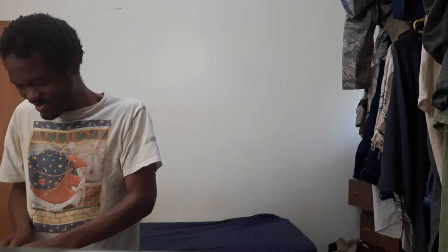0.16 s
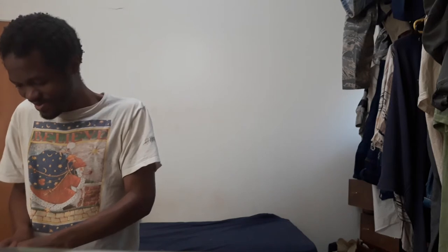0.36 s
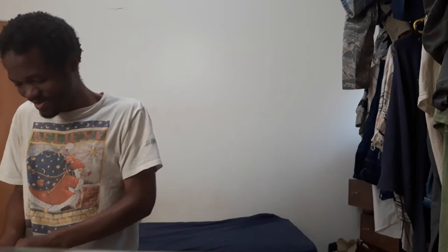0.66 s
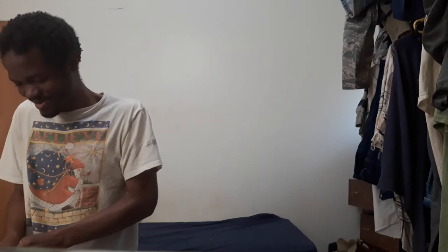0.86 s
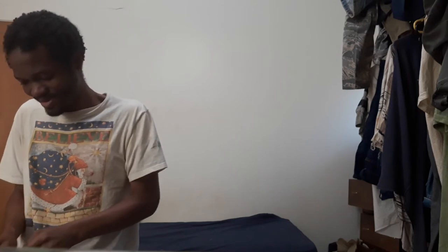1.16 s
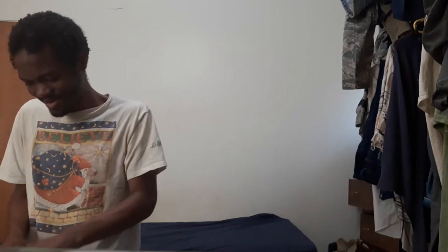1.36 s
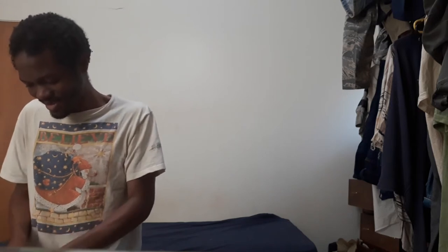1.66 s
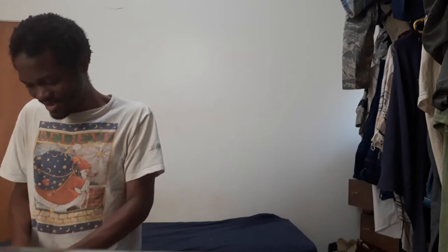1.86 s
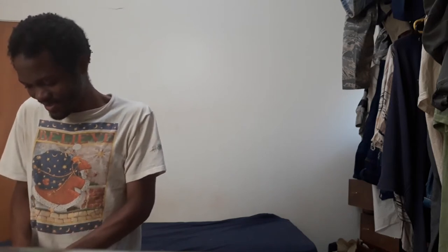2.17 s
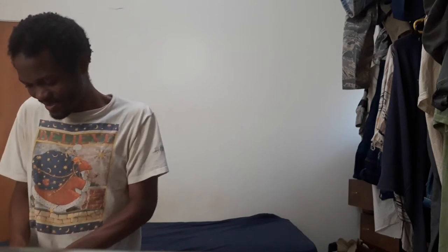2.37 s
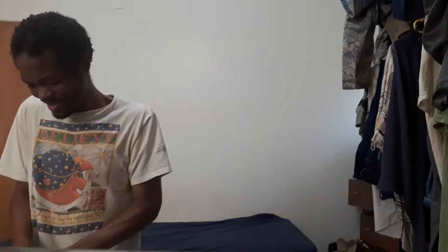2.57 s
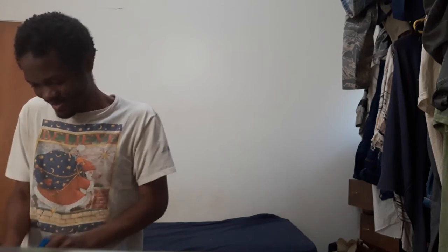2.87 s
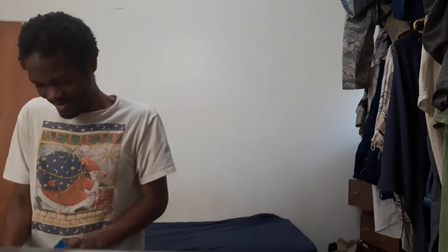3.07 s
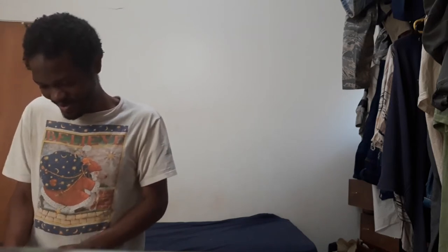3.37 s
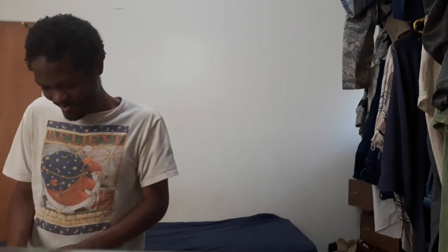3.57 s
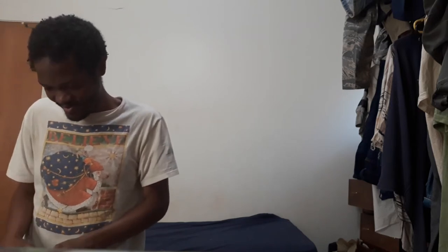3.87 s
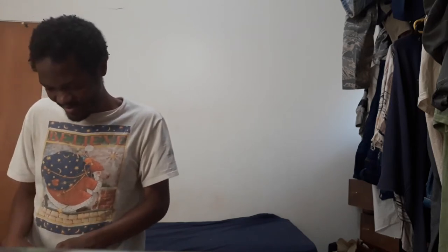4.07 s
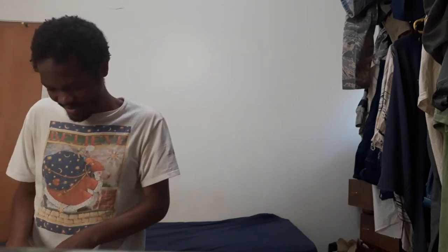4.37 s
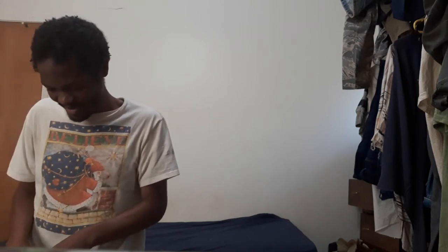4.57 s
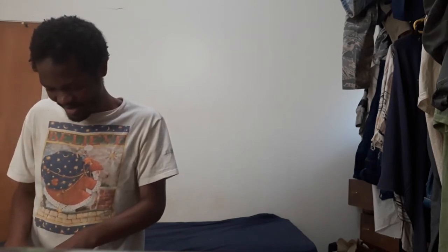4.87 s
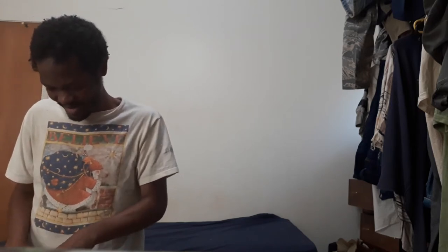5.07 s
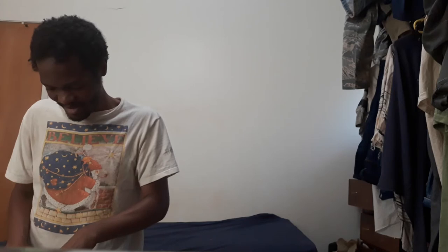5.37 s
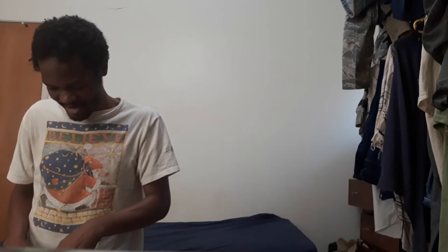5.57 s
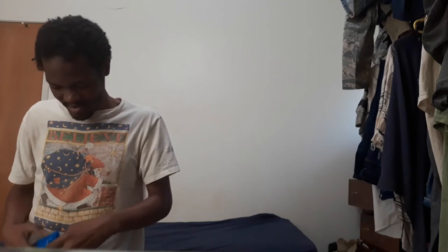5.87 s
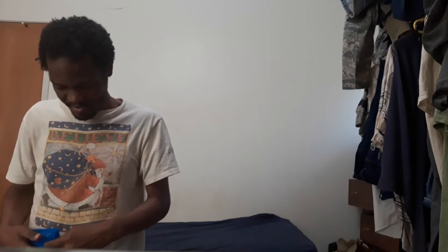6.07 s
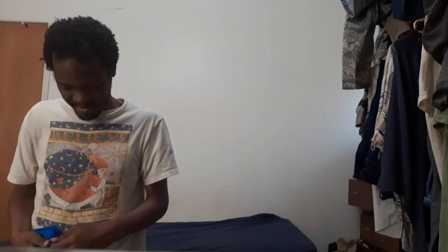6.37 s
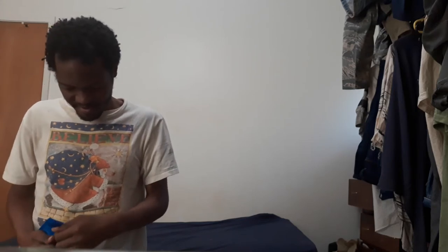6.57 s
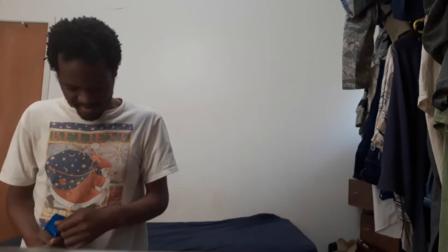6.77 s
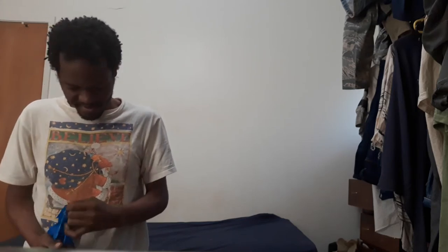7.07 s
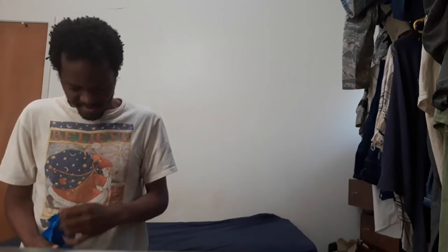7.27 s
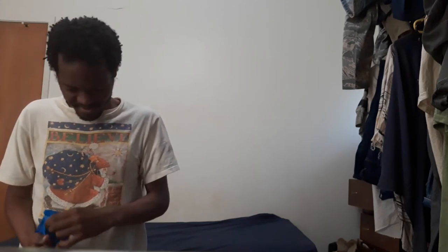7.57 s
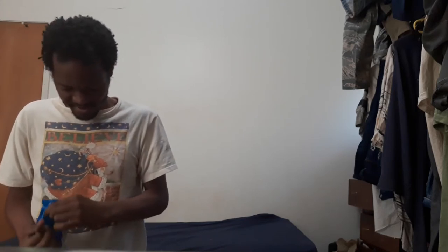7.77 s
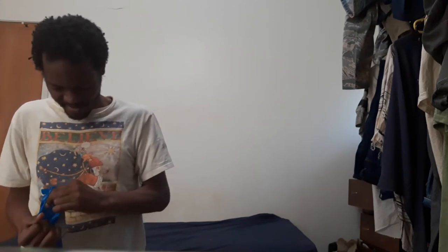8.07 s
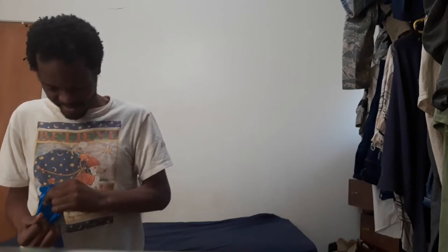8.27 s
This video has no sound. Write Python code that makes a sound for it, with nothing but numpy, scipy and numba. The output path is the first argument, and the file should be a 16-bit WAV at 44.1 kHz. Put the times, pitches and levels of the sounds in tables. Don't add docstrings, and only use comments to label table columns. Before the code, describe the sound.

Close to the microphone in a quiet, damped bedroom, hands tear a small plastic packet. Small crackles lead to a sharp rip within the first half second, then looser rustling. A denser flurry of snaps and rips follows, with soft low knocks on a wooden desk as the contents land. Afterwards come scattered light crinkles and thin folding sounds, over faint hiss and a distant low hum.

```python
import sys
import numpy as np
from scipy import signal
from scipy.fft import rfft, irfft, next_fast_len
from scipy.io import wavfile
from numba import njit

SR = 44100
rng = np.random.default_rng(int(sys.argv[2]) if len(sys.argv) > 2 else 0)


def ratio_of_db(decibels):
    return 10 ** (np.asarray(decibels, float) / 20)


def put_to_file(sound):
    columns = np.atleast_2d(sound).T
    safe = np.clip(columns, -1, 1)
    whole_steps = np.round(safe * 32767)
    wavfile.write(sys.argv[1], SR, whole_steps.astype(np.int16))


N = 370881

# f/Hz, density level/dB
AIR_SPECTRUM = [(28, -17), (48, -1.5), (130, -0.5), (200, -14), (1200, -27.5), (3200, -16), (6300, -24.5),
                (16000, -48)]
# t/s, level/dB
HUM_FADE = [(4.5, 1), (7.5, -2)]
# f/Hz, t60/s
ROOM_DECAY = [(150, 0.27), (1000, 0.27), (4000, 0.25), (12000, 0.21)]
# f/Hz, level/dB
MIC_RESPONSE = [(40, -31), (90, -16), (170, -3.5), (300, -2.5), (600, 1), (1000, -8), (1400, -1), (2300, 2),
                (3200, 3.5), (4500, 0), (6500, -3.5), (9000, 3.5), (12000, -0.5), (16000, -1.5)]
# f/Hz, level/dB
RECORDER_TOP = [(16330, 0), (16530, -70)]
# f/Hz, level/dB
LOW_DIPS = [(450, 1), (570, -0.5), (690, -7), (850, 0.5), (1050, 0), (1250, 1.5), (1700, -3), (2200, -1)]
# f/Hz, level/dB
LIFTED_DIPS = [(450, 2), (800, 3), (1050, 3.5), (1500, 3), (2700, -2), (6000, 7), (8000, -4.5), (9500, 3)]
# t/s, peak level/dB
THUMPS = [
    (0.489, -49.5),
    (2.772, -36),
]
# t/s, peak level/dB, panel overtone level/dB
KNOCKS = [(1.952, -53, 2), (2.15, -43, -18), (2.693, -54.5, 19), (2.738, -34, -6), (2.845, -36.5, -7.5),
          (3.095, -40.5, -12), (3.13, -36, -11), (3.342, -43, -23), (3.388, -29.5, -16), (3.442, -32, -7),
          (3.509, -34, -4), (3.686, -23, -24), (3.693, -40.5, -2), (3.744, -24, -12.5), (3.766, -39, 2.5),
          (5.542, -40.5, -0.5)]
# f/Hz, level/dB, t60/s
DESK_MODES = [(105, -4, 0.12), (189, 5.5, 0.098), (218, -4.5, 0.11)]
# f/Hz, level/dB, t60/s
PANEL_MODES = [(392.5, 1.5, 0.14), (462, 10, 0.033), (610, -8, 0.078), (828, -25, .05)]
# t/s, f/Hz
POCKET_PITCH = [(0, 1120), (.5, 918), (3.5, 958), (3.7, 708), (4.0, 1047), (5.9, 1283), (6.7, 1300),
                (7.0, 1000), (7.6, 1130), (8.2, 1214), (8.4, 700)]
# start t/s,
# length t/s, level/dB, f/Hz
CAVITIES = [(0.22, 0.049, -49.5, 2400), (.47, 0.062, -29.5, 2020), (0.48, 0.045, -39.5, 420),
            (2.737, 0.027, -31.5, 5460), (6.797, 0.065, -66, 450), (7.315, 0.044, -66, 530),
            (8.076, 0.036, -62, 490), (5.546, 0.049, -59, 700), (2.75, 0.019, -32, 1950),
            (2.858, .015, -52, 1800), (3.094, 0.04, -41, 1800), (3.096, 0.061, -46.5, 2900),
            (3.099, 0.061, -42, 640), (3.167, 0.09, -55.5, 2630), (3.16, 0.093, -52.5, 1700),
            (3.094, 0.054, -51, 5400), (3.164, 0.076, -55, 740), (3.437, .05, -55, 4100),
            (3.43, 0.037, -57, 3800), (3.86, .12, -63.5, 3540), (3.316, 0.033, -51, 1420),
            (3.442, 0.052, -47, 1500), (3.502, 0.037, -44.5, 1510), (6.806, 0.057, -54, 790),
            (6.905, 0.041, -59, 880), (7.195, 0.022, -54, 1400), (7.937, 0.06, -67, 1170),
            (7.906, 0.017, -42.5, 940), (8.16, 0.11, -71, 1210), (8.333, 0.052, -62, 1440),
            (4.299, 0.71, -91, 3330), (1.954, 0.048, -50, 940), (2.58, 0.13, -55.5, 450),
            (4.8, 0.12, -71, 1300), (5.7, .07, -63, 830), (6.276, 0.22, -65, 1310),
            (6.598, 0.062, -59, 1250), (7.12, 0.048, -60, 830), (7.006, 0.039, -41, 890),
            (7.185, 0.03, -56, 2100), (7.305, 0.045, -58, 820), (7.75, 0.26, -75.5, 440),
            (7.66, 0.21, -69.5, 1220), (7.6, 0.014, -54, 1290), (8.075, 0.074, -51, 1150),
            (8.32, 0.064, -64.5, 420),
            (8.08, 0.033, -52, 8300), (8.081, 0.03, -52, 12000), (2.735, .04, -39, 20000),
                  (2.736, .035, -35, 10000), (2.63, .13, -51.5, 21000), (2.689, .008, -41, 10000),
                  (7.2, 0.042, -56, 1720), (5.95, .06, -59, 1320), (7.62, 0.18, -71, 3600),
                  (7.8, 0.078, -68, 1840), (6.7, .06, -68, 2300), (1.4, 0.25, -66.5, 3220),
                  (7.2, 0.64, -79, 401), (.44, 0.04, -36, 2100), (2.2, 0.058, -48, 1540),
                  (6.8, .25, -65.5, 640), (1.944, 0.017, -45, 5240)]
# start t/s, length t/s, level/dB, hollow level/dB, bright level/dB
GRIPS = [
    (0, 1.4, -68.5, -8, -18),
    (1.43, 2.4, -70, -19, -11.5),
    (4.682, 4.6, -69.5, -6, -3.5),
    (8.203, 0.33, -100, -4, -13),
]
# start t/s, length t/s, level/dB, hollow level/dB, bright level/dB
SHIFTS = [(0.0, 0.036, -52.5, -8.5, -11.5), (.07, 0.23, -58.5, -2, -13.5), (.41, 0.22, -48.5, -12, -6),
          (.71, 0.18, -53, -14, -13), (.95, 0.054, -46.5, -19, -11), (1.1, 0.31, -54, -35, 0),
          (1.55, 0.24, -58.5, -7, -8.5), (1.86, 0.27, -54.5, -21, -2.5), (2.14, 0.39, -51.5, -11, -4),
          (2.56, 0.37, -46.5, -8.5, -0.5), (3.1, 0.4, -57, -5, -10), (3.69, 0.21, -56.5, -24, -16),
          (3.95, 0.12, -55, -15, -14), (4.19, 0.13, -60.5, -13, -4.5), (4.64, 0.23, -69, -7, -10),
          (4.95, 0.062, -65, -27, -13), (5.13, 0.23, -65, -16, -10), (5.35, 0.811, -55.5, -6.5, -3),
          (6.26, 0.21, -61.5, -7, -5), (6.44, 0.072, -55.5, -17, -4.5), (6.6, 0.27, -57, -2, 2),
          (7.13, 0.32, -62, -11, -6.5), (7.31, 0.08, -67.5, -6, 12), (7.5, 0.44, -69.5, -1, 5),
          (7.95, 0.19, -65, -5, 4), (2.95, 0.029, -56.5, -8, -4)]
# start t/s, length t/s, end level/dB, hollow level/dB, bright level/dB
PULLS = [(.125, 0.046, -50, -5, -6), (.18, 0.084, -45, -2.5, -4), (.428, 0.073, -25.5, 1, -2.5),
         (1.32, 0.05, -59, -11, 3), (1.925, 0.027, -41.5, -36, 1), (2.18, 0.051, -40, -2, 2.5),
         (2.676, 0.0094, -34.5, 2, -3), (5.36, 0.061, -67, -20, 12.5), (5.86, 0.063, -48, -6, -10),
         (6.87, 0.15, -47, -5.5, 2.5), (7.88, 0.049, -53, -1.5, -5)]
# start t/s, length t/s, start level/dB, hollow level/dB, bright level/dB
SLIPS = [(1.215, 0.093, -49.5, -9.5, 1.5), (1.96, 0.063, -56.5, 8, -14), (2.145, 0.033, -41.5, 1, -5),
         (2.25, 0.065, -44.5, 2, -3.5), (2.735, 0.046, -33.5, 2, -1), (2.85, 0.098, -48, 4.5, -3),
         (3.097, 0.064, -43.5, 0, -9.5), (3.18, 0.12, -56, 3.5, -8.5), (3.315, 0.16, -62, 4.5, -24),
         (3.441, 0.035, -43, 3.5, -17.5), (3.503, 0.024, -47.5, 1, -24), (3.687, 0.041, -42, 3, -26.5),
         (3.735, 0.054, -44, 5.5, -16), (8.08, 0.041, -54.5, 6, 6.5), (8.335, 0.11, -75, 8.5, -14)]
# t/s, peak level/dB, hollow level/dB,
# bright level/dB, film f/Hz
SNAPS = [(0.0706, -36.5, -19, -23, 3040), (0.1254, -37.5, -18, -26, 3050),
         (0.1308, -33, -34, -23, 3100), (0.152, -34, -15, -23, 3100),
         (0.3642, -52.5, -24, -23.5, 3470), (0.2312, -30.5, -9.5, -16, 3220),
         (0.409, -30.5, -23, -27.5, 3340), (0.4304, -32.5, -15.5, -14.5, 2530),
         (0.4453, -27, -16, -11.5, 3100), (0.4702, -13.5, -11, -16.5, 2080),
         (0.4779, -10, -19, -13, 2360), (0.4952, -13, -11.5, -19.5, 2840),
         (0.953, -57, -26, -36, 2300), (0.9701, -36.5, -24, -23, 3170),
         (1.1041, -34.5, -48, -10.5, 5150), (1.1928, -40, -28, -5, 2360),
         (1.2201, -37.5, -17, 2, 5200), (1.7234, -40.5, -33, -11, 3630), (1.8641, -38, -50, -29, 3540),
         (1.8987, -43, -34, 1, 5100), (1.9431, -24, -17, -6, 3100), (1.9953, -32.5, -17, -8.5, 4200),
         (2.0694, -30.5, -18.5, -15, 4660), (2.124, -48, -13, -1, 2830),
         (2.141, -19.5, -21, -15.5, 2750), (2.1903, -25, -11, -19, 4500),
              (2.204, -25, -14, -6.5, 3000), (2.2199, -29.5, -22, -2, 3000), (2.2694, -35, -7, 4.5, 2950),
              (2.4546, -28, -36, -21, 4460), (2.5655, -48, -30.5, -2, 3370), (2.5881, -50, -20, -11, 2610),
              (2.628, -25.5, -10, -2.5, 2870), (2.6898, -13, -15, -14, 2870),
              (2.6924, -16.5, -25, -14, 2050), (2.732, -12, -18, -15, 2050), (2.7363, -26, -13, -6, 2570),
              (2.743, -17.5, -13, -7.5, 2180), (2.75, -24.5, -12.5, -3, 2630), (2.76, -28.5, -12, -9, 4460),
              (2.8444, -38, 5.5, -15, 4060), (2.862, -19, -17, -16, 3080), (3.0953, -31, -3.5, -17, 3000),
              (3.3141, -39, -18, -32, 2370), (3.347, -35, -30, -39, 2930), (3.3875, -35.5, -1, -41, 3770),
              (3.4421, -33, -9, -33, 3930), (3.5029, -34, -1, -35, 3830), (3.684, -28.5, -9, -25, 2900),
              (3.7324, -36, -3, -10, 3380), (3.5718, -42, -20, -28, 3530), (3.663, -50, -26, -27, 3070),
              (2.685, -30, -9, -11, 2780), (2.7545, -24, -24, -6, 4460), (2.872, -33, -15, -9, 2500),
              (3.456, -46, -8, -19, 4300),
         (3.967, -44.5, -34, -34, 2700), (3.9972, -38.5, -27, -35.5, 4240),
              (4.1467, -45.5, -34, -33, 3410), (4.2446, -42, -31, -22, 4200),
              (4.2852, -38.5, -27.5, -16, 3350), (4.8422, -47, -16, -15, 3100),
              (5.015, -46.5, -23, -10, 3800), (5.0584, -45, -19, -13, 4300), (5.131, -52, -8, -24, 2620),
              (5.1671, -45, -13, -23, 2400), (5.3665, -34, -44, -29.5, 4550),
              (5.5413, -22, -26, -15.5, 3100), (5.5447, -27.5, -21, -8.5, 6250),
              (5.586, -40, -15, -6, 5500), (5.399, -45, -30, -4, 4700), (5.426, -42, -35, -14.5, 4000),
              (5.909, -48, -13, -15, 2500), (6.261, -46, -30, -10, 3600), (6.314, -40.5, -22, -13, 3300),
              (5.6461, -37, -12.5, -7, 3450), (5.7153, -30, -16, -13.5, 2930),
              (5.8523, -39.5, -14.5, -31, 4000), (5.946, -29, -26, -16, 2700),
              (6.0142, -37, -25, -8.5, 3780), (6.0656, -34.5, -41, -30, 2903), (6.151, -44, -36, -23, 3450),
              (6.268, -28, -41, -26, 4000), (6.3047, -35, -24, -10.5, 3370), (6.4487, -36, -21, -25, 3750),
         (6.605, -37, -38, -6, 2670), (6.7, -37.5, -33, -21, 3800), (6.7145, -33, -21, -15, 3300),
              (6.739, -32, -16, -7.5, 3450), (6.7992, -32, -13.5, 1.5, 4470), (6.662, -38, -24, -19, 3330),
              (6.8747, -38, -18, -11, 3370), (6.9005, -46, -6, -3, 4170), (6.9146, -37, -18, -5, 3350),
              (6.925, -42, -2, -5, 2420), (7.165, -61, -34, -17, 2950), (7.534, -51, -25, -11, 4910),
              (7.626, -51, -20, -15, 3280), (7.8855, -47, -25, -18, 3320), (8.0686, -42.5, -3, -12, 3460),
              (8.278, -49.5, -30, -28, 3270), (8.3927, -50, -18, -14, 4130), (6.9426, -44, -12, 5, 2600),
              (6.9652, -32.5, -26, 1.5, 3350), (6.9895, -33, -11, -2, 6620), (7.001, -45, -16, 4, 4600),
              (7.014, -42, -6.5, -7, 2600), (7.675, -55, -22, -18, 3600), (7.789, -51, -13, -4, 3600),
              (7.353, -43, -24, -14, 3260), (7.1464, -36.5, -17, -24, 3380),
              (7.1773, -29.5, -20, -8.5, 3100), (7.3198, -37, -13, -31, 3550),
              (7.4125, -38.5, -31, -5.5, 5000), (7.7106, -43, -21, -20, 3380),
              (7.7449, -45.5, -11, -6, 3300), (7.905, -33.5, -12, -14, 2170),
              (7.928, -36.5, 2.5, -15.5, 3150), (8.0296, -46, 0, -1, 4160), (8.0798, -30.5, -5.5, -4, 5100),
              (8.0795, -31.5, -29, 2.5, 2320), (8.334, -48, -10.5, -13, 4140)]

FILM_HZ, EDGE_HZ = 3110, 7000
ECHO_S, ECHO_DB = 0.0025, -2
CAVITY_WET, SNAP_WET, DESK_WET = 0.35, 0.65, 0.64
SILENT_DB = -30
PITCH, SIZE, SIGN, WHEN, BIG = slice(0, 3), slice(3, 6), 6, 7, 8


def colour(x, points):
    hz, db = np.transpose(points)
    size = next_fast_len(len(x))
    f = np.maximum(np.arange(size // 2 + 1) * SR / size, 1)
    gain = ratio_of_db(np.interp(np.log(f), np.log(hz), db))
    return irfft(rfft(x, size) * gain, size)[:len(x)]


def level(x, db):
    return x * ratio_of_db(db) / np.sqrt(np.mean(x ** 2))


@njit
def rings(count, start, step, fade, rise, size):
    out = np.zeros(count)
    for k in range(len(start)):
        c, s = fade[k] * np.cos(step[k]), fade[k] * np.sin(step[k])
        x, y, q = size[k], 0., 1.
        i = int(start[k])
        for n in range(i, min(i + int(5 / (1 - fade[k])), count)):
            out[n] += y * (1 - q)
            x, y, q = c * x - s * y, s * x + c * y, q * rise[k]
    return out


def strike(s, hz, tau, size, soft):
    s, hz, tau, size = (np.ravel(v + 0. * hz) for v in (s, hz, tau, size))
    fade = np.exp(-1 / (tau * SR))
    rise = np.exp(-1 / (soft * tau * SR))
    return rings(N, s * SR, 2 * np.pi * hz / SR, fade, rise, size)


def air():
    hum_hz, width_hz = 92, 27
    hum_band = [(hum_hz - 2 * width_hz, -40), (hum_hz, 0), (hum_hz + 2 * width_hz, -40)]
    hiss = level(colour(rng.standard_normal(N), AIR_SPECTRUM), -67)
    hum = level(colour(rng.standard_normal(N), hum_band), -66.5)
    return hiss + hum * ratio_of_db(np.interp(np.arange(N) / SR, *np.transpose(HUM_FADE)))


def room_tail(t):
    hz, t60 = np.transpose(ROOM_DECAY)
    tail = 0
    for f in 100 * 2. ** np.arange(8):
        octave = [(f / 2, -40), (f / 1.3, 0), (f * 1.3, 0), (f * 2, -40)]
        band = colour(rng.standard_normal(len(t)), octave)
        tail = tail + band * ratio_of_db(-60 * t / np.interp(np.log(f), np.log(hz), t60))
    tail *= 1 - np.exp(-(t / 0.0026) ** 2)
    tail *= ratio_of_db(-1.5) / np.sqrt(np.sum(tail ** 2))
    echo_s = ECHO_S * (1 + 0.25 * (rng.random() - 0.5))
    tail[int(echo_s * SR)] += ratio_of_db(ECHO_DB)
    return tail


def room(x):
    places, moves_per_s = 6, 5.5
    t = np.arange(SR // 3) / SR
    place = np.arange(N) / SR * moves_per_s
    out = x
    for k in range(places):
        away = np.abs((place - k + places / 2) % places - places / 2)
        share = np.cos(np.pi / 2 * np.minimum(away, 1))
        out = out + signal.oaconvolve(x * share, room_tail(t))[:N]
    return out


def thumps():
    s, db = np.transpose(THUMPS)
    t60_s = 0.2
    return strike(s, 78.4 + 0 * s, t60_s / np.log(1000), ratio_of_db(db + 19.0), soft=0.45)


def desk():
    s, db, over_db = np.transpose(KNOCKS)[:, :, None]
    hz, mode_db, t60 = np.transpose(DESK_MODES + PANEL_MODES)
    is_panel = np.arange(len(hz)) >= len(DESK_MODES)
    scatter_db = 1.98 * rng.standard_normal((len(s), len(hz)))
    detune = 1 + 0.008 * rng.standard_normal((len(s), len(hz)))
    size = ratio_of_db(db + 0.9 + mode_db + scatter_db + (over_db - 9.0) * is_panel)
    return strike(s, hz * detune, t60 / np.log(1000), size, soft=0.12)


def creases(s, db, hz, chance, turns, spread):
    hz = hz * 2 ** (np.c_[list(spread)] * (2 * chance[PITCH] - 1))
    hz = np.clip(hz, 200, 0.4 * SR)
    tau = np.c_[list(turns)] / hz
    size = ratio_of_db(db + 12.5 + 9.7 * (chance[SIZE] - 0.5)) / np.sqrt(tau * SR)
    return strike(s, hz, tau, size * np.sign(chance[SIGN] - 0.5), soft=0.54)


def crackle(curves, per_s, scatter_db, trim_db, **ring):
    chance = rng.random((per_s * N // SR, BIG + 1)).T
    when = chance[WHEN] * N / SR
    big_db = -scatter_db * np.log(1 - 0.985 * chance[BIG])
    big_db += trim_db - 10 * np.log10(np.mean(ratio_of_db(2 * big_db)) * per_s / SR)
    out = []
    for curve in curves:
        s, *columns = np.transpose(curve)
        on = (when > s.min()) & (when < s.max())
        mid_db, low_db, high_db, low_hz = (np.interp(when[on], s, c) for c in columns)
        db = np.array([low_db, mid_db, high_db]) + big_db[on]
        hz = np.array(np.broadcast_arrays(low_hz, FILM_HZ, EDGE_HZ))
        out.append((when[on], db, hz, chance[:, on]))
    return creases(*map(np.hstack, zip(*out)), **ring)


def cavities():
    curves = []
    for s, length, db, hz in CAVITIES:
        mute_db = db + 2 * SILENT_DB
        curves.append([(t, mute_db, db, mute_db, hz) for t in (s, s + length)])
    return crackle(curves, per_s=1400, scatter_db=0.7, trim_db=-4.0, turns=(3.9, 1, 1), spread=(0.09, 0, 0))


def pocket(s):
    return np.interp(s, *np.transpose(POCKET_PITCH))


def strokes(rows, attack_s, first_db, last_db, release_s):
    curves = []
    for s, length, db, hollow, bright in rows:
        end = s + max(length, attack_s)
        shape = [(s, SILENT_DB), (s + attack_s, first_db), (end, last_db), (end + release_s, SILENT_DB)]
        curves.append([(t, db + d, db + d + hollow, db + d + bright, pocket(t)) for t, d in shape])
    return curves


def rustle():
    curves = strokes(SHIFTS + GRIPS, 0.0067, 0, -2.5, 0.032)
    return crackle(curves, per_s=1000, scatter_db=2.0, trim_db=-9.5, turns=(2.5, 1.3, 1.1), spread=(0.7, 0.9, 0.7))


def rips():
    curves = strokes(PULLS, 0, -16.5, 0, 0.021) + strokes(SLIPS, 0, 0, -12, 0.0091)
    return crackle(curves, per_s=2500, scatter_db=2.5, trim_db=-3, turns=(1.8, 1.3, 1.1), spread=(0.8, 0.95, 0.7))


def fold_snaps():
    run = 20
    rows = SNAPS
    s, db, hollow, bright, hz = np.repeat(rows, repeats=run, axis=0).T
    chance = rng.random((len(s), BIG)).T
    lead = np.arange(len(s)) % run == 0
    chance = np.where(lead, 0.51, chance)
    late = chance[WHEN] ** 1.6 * ~lead
    crease_db = db - 4 - 5.7 * late + 9 * lead
    bands_db = crease_db + np.array([hollow + 10, 0 * s, bright + 8])
    hz = np.array([pocket(s), hz, EDGE_HZ + 0 * s])
    snap_s = 0.0026
    return creases(s + snap_s * late, bands_db, hz, chance, turns=(2.2, 1.3, 0.9), spread=(0.4, 0.45, 0.7))


def scene():
    knocks, notes, snaps = desk(), cavities(), fold_snaps()
    film = rustle() + rips()
    echoed = snaps + ratio_of_db(ECHO_DB) * np.roll(snaps, int(ECHO_S * SR))
    close = (1 - SNAP_WET) * echoed + (1 - CAVITY_WET) * notes + (1 - DESK_WET) * knocks
    distant = room(film + SNAP_WET * snaps + CAVITY_WET * notes + DESK_WET * knocks)
    near = close + distant + thumps()
    lifted = np.interp(np.arange(N) / SR, (2.4, 9.5), (0, 1))
    near = (1 - lifted) * colour(near, LOW_DIPS) + lifted * colour(near, LIFTED_DIPS)
    return (colour(near, MIC_RESPONSE) + air())[None]


def top_cut(x):
    return signal.sosfilt(signal.butter(12, 15820, fs=SR, output="sos"), x)


def record(dry):
    mix = colour(dry[0], RECORDER_TOP)[None]
    return top_cut(mix)


dry = scene()
out = record(dry)
put_to_file(out)
```